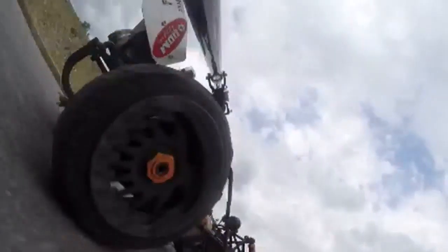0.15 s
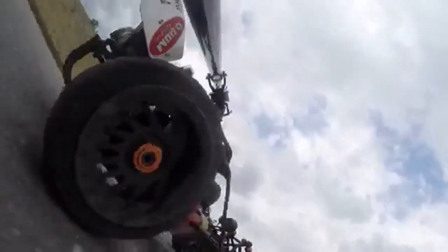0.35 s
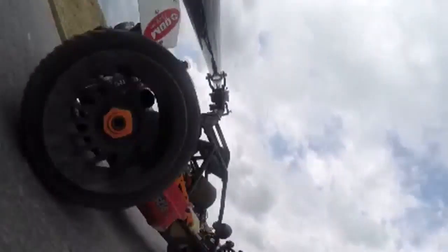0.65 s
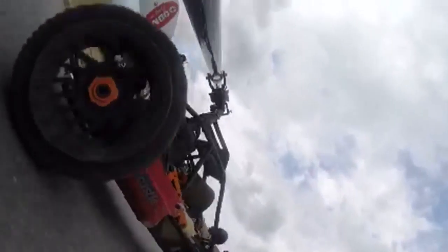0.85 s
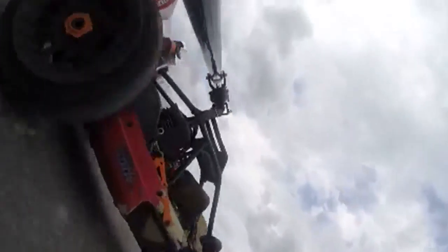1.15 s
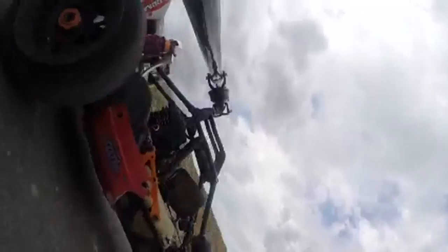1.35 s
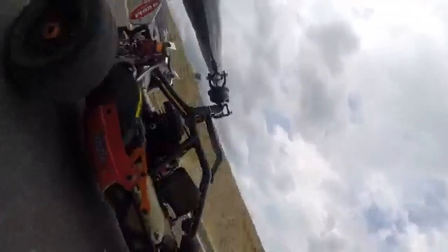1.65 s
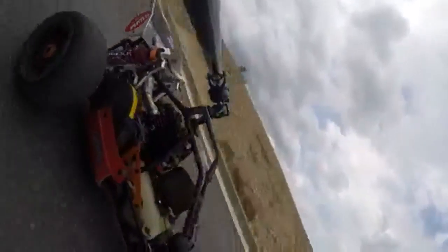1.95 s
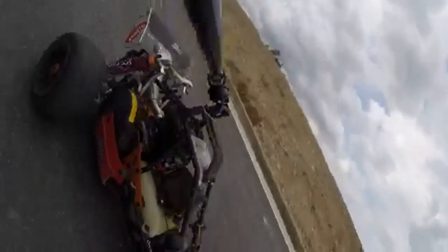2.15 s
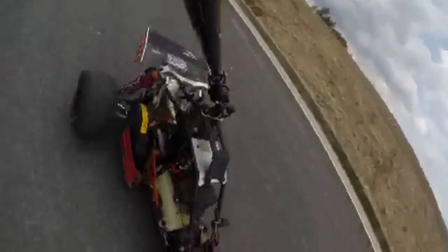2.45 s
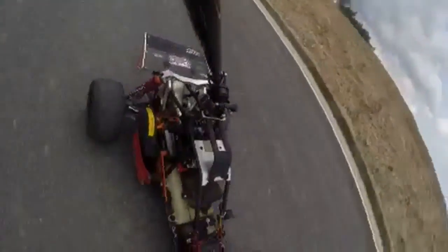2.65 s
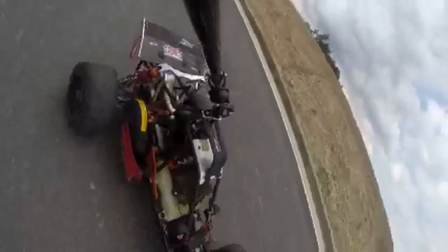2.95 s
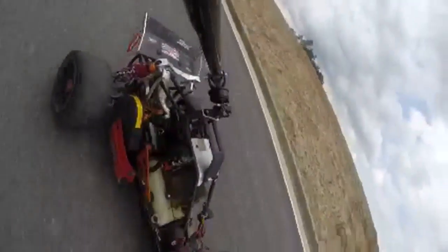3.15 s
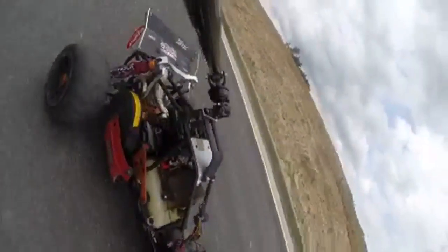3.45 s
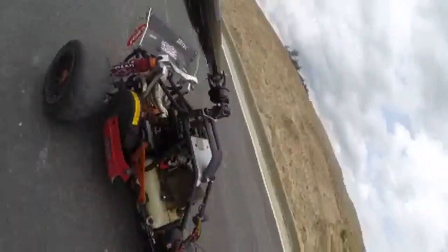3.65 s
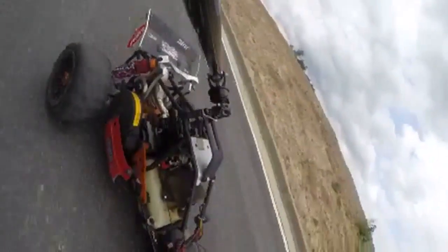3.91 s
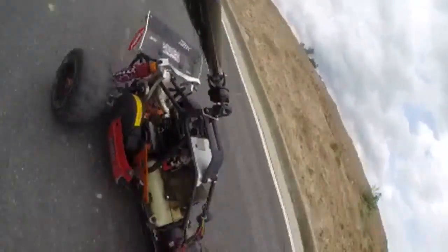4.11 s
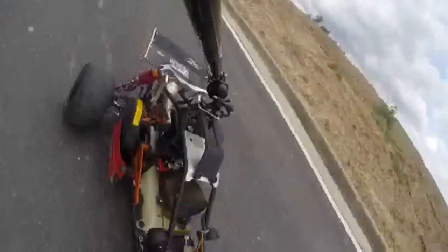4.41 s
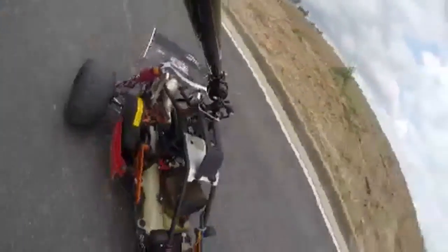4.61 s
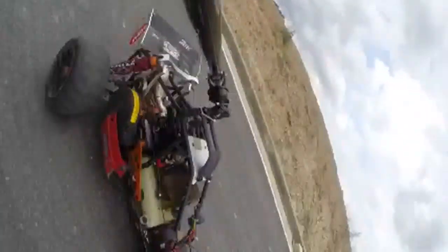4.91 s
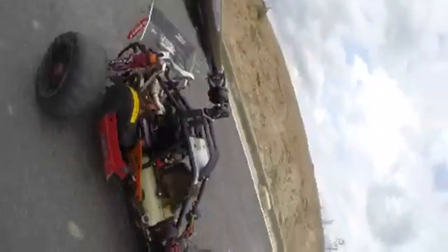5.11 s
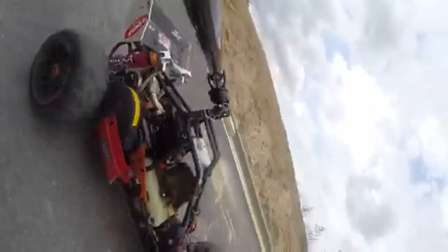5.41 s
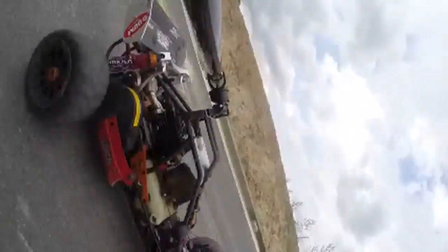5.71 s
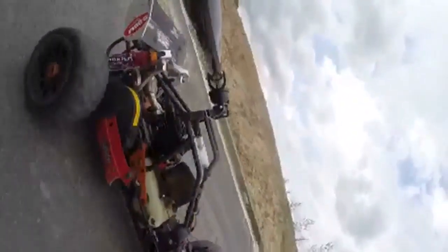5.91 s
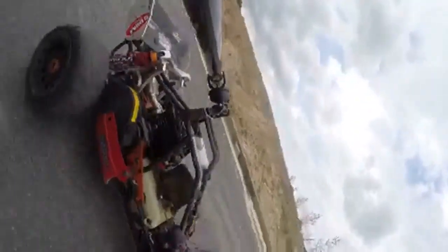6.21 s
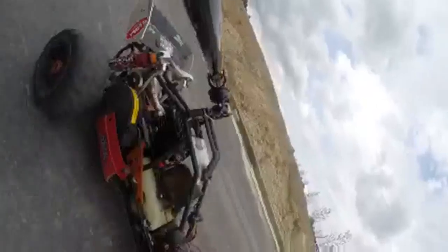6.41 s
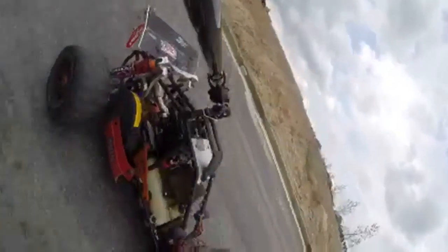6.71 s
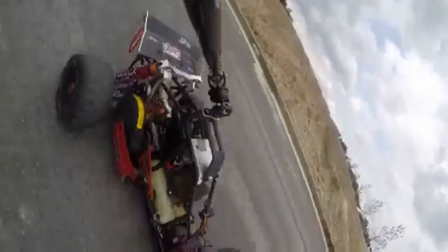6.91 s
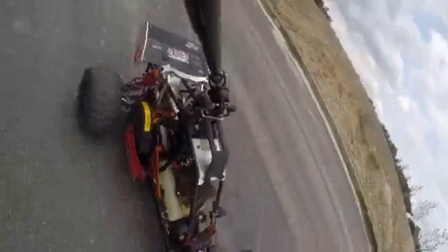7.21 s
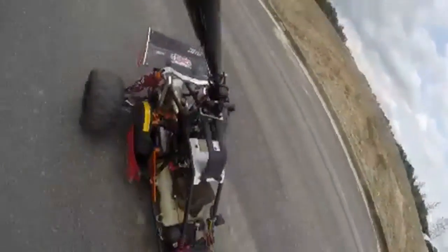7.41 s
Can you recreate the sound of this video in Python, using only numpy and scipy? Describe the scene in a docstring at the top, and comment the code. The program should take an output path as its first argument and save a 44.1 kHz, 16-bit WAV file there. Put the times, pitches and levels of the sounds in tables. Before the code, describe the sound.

Heard from aboard, a remote-controlled buggy's petrol engine runs flat out, drops to idle and blips once, amid close rattles and sharp knocks.

```python
"""On the road, aboard a small two-stroke buggy; the microphone is in a camera on a pole clamped to the
frame. The engine runs at full speed, lifts off near 1.4 s, falls to idle and blips again at 6.65 s; the
brake squeals twice. Firing hum, gear whine, driveline drone, rattles and blows come up the pole and are
heard very close. Rattles, knocks and blows ring in the camera housing, and the hardest blows make the
limiter duck everything."""
import sys
import numpy as np
from scipy import signal
from scipy.fft import rfft, irfft
from scipy.io import wavfile
from scipy.ndimage import uniform_filter1d, minimum_filter1d

SR = 44100
rng = np.random.default_rng(int(sys.argv[2]) if len(sys.argv) > 2 else 0)


def bounce(signal):
    """Save signal as a 16-bit WAV file at the path given by the first command-line argument."""
    frames = np.transpose(np.atleast_2d(signal))
    limited = np.clip(frames, -1, 1)
    pcm = np.round(limited * 32767).astype(np.int16)
    wavfile.write(sys.argv[1], SR, pcm)


N = 333396

# Engine speed and the rattle that goes with it: t/s, firing rate/Hz, rattle level/dB
ENGINE_RUN = [(0, 189.9, -19), (.58, 199, -18), (.86, 202.6, -16), (1.14, 205.5, -18), (1.28, 205, -18),
              (1.35, 208.2, -20), (1.43, 197.4, -19), (1.5, 189, -22.5), (1.72, 179.4, -24),
              (1.88, 168.9, -22), (1.96, 164.6, -20.5), (2.2, 150.7, -21), (2.32, 145.7, -21.5),
              (2.5, 136, -26), (2.72, 125, -23.5), (2.88, 116.9, -37), (3.18, 106.3, -35.5),
              (3.48, 95.94, -38), (3.93, 79.55, -36.5), (4.23, 73.6, -42), (4.38, 73.8, -35.5),
              (4.65, 73, -41), (4.85, 70.32, -39), (5.33, 69.1, -39), (5.5, 71.5, -36.5), (5.81, 71.5, -41),
              (6.0, 74, -38.5), (6.58, 72.8, -40), (6.64, 77.3, -35), (6.7, 89.9, -34), (6.76, 97.5, -33),
              (6.95, 99, -32), (7.07, 96, -31.5), (7.2, 96.4, -33), (7.3, 89.46, -28), (7.53, 76.93, -32)]
# Firing orders as the pole carries them: firing rate/Hz, then level/dB of orders 1, 2, 3 and 5
POLE_ORDERS = [(69.3, -9, -31.5, -43.5, -47.5), (71.9, -8.5, -34.5, -40.5, -42.5),
               (73.7, -8.5, -42, -39, -49.5), (83.2, -10, -32, -33, -61), (80.6, -11, -31.5, -36.5, -63),
               (97.1, -11, -34.5, -52, -61.5), (107, -13, -48, -42, -66), (117, -15.5, -34, -40, -61),
               (138.14, -16.5, -38, -42, -47), (145.4, -15.5, -42.5, -38.5, -33), (150, -13, -40, -32, -32),
               (158, -15, -25, -33, -40), (165, -17, -29, -42, -50), (187, -14.5, -49, -50, -72),
               (192, -19.5, -35.5, -45.5, -37), (193, -23.5, -34.5, -51.5, -40.5),
               (210, -21.5, -44.5, -46, -36)]
# Orders that join at higher revs: order, level/dB against the fifth
HIGH_REV_ORDERS = [(4, -8.5), (6, 6), (7, -4)]
# The throttle opening again: t/s, length/s, level/dB
THROTTLE_BLIP = [(6.65, .7, 0)]
# Wheel speed: t/s, rotation rate/Hz
WHEEL_SPEED = [(0, 24.1), (.35, 24.7), (.9, 25.7), (1.35, 26.3), (1.6, 25.6), (1.95, 24.3), (2.6, 21.5)]
# Gear teeth meshing: multiple of the firing rate or the wheel rate, level/dB
ENGINE_MESH, WHEEL_MESH = [(19, -59), (26, -69)], [(164, -54)]
# Load on the gears: t/s, engine side gain/dB, wheel side gain/dB
GEAR_LOAD = [(0, 10, 8), (1.35, 21.5, 7.5), (1.45, -25, 4), (2, -35, 4), (2.3, -29.5, -35.5)]
# Load on the driveline: t/s, gain of its tones
DRIVE_LOAD = [(0, 0.58), (1.45, 1), (2, 0.68), (2.6, 0.12)]
# Driveline drone and road rumble together: t/s, gain/dB
DRONE_GAIN = [(0, -20.5), (.6, -17.5), (1.5, -20), (2, -29), (2.4, -19.5), (3.3, -26.5), (5, -23.5),
              (7, -24), (7.56, -20)]
# Driveline tones: multiple of the wheel rate, relative level/dB
DRIVELINE_ORDERS = [(1, -5.5), (2.75, 0), (3.95, 6.5), (7, 6), (10, -60.5), (14, -11)]
# Spectrum of the road rumble: f/Hz, relative level/dB
ROAD_SPECTRUM = [(20, -21.5), (45, -9), (80, 14), (120, 2), (200, -6.5), (340, -9), (460, -20.5),
                 (700, -21), (1000, -45.5)]
# Main modes of the camera housing: f/Hz, width/Hz, relative level/dB
HOUSING_MODES = [(350, 129, -12), (831, 142, -7), (970, 50, -9.5), (1236, 192, 1), (1791, 226, -5.5),
                 (2186, 236, -6.5), (2550, 1320, -25.5)]
# Its treble modes: f/Hz, width/Hz, relative level/dB
HOUSING_TREBLE = [(3430, 1400, -7.5), (3880, 400, 1), (4170, 380, 1.5), (5540, 1670, -6.5),
                  (7550, 1900, -13.5), (10600, 2700, -22)]
# The duller rattle at idle: f/Hz, width/Hz, relative level/dB
IDLE_MODES = [(340, 130, -5), (768.6, 95, 0.5), (956, 110, -1), (1227.3, 220, 0.5), (1810, 540, -10),
              (2630, 860, -20)]
# Hard blows on the pole: t/s, level/dB, scrape length/s, bright share/dB, ring f/Hz, ring level/dB
POLE_BLOWS = [(.154, 3.5, 0.0086, 2.5, 1830, 0), (0.193, -5.5, 0.01, 8.5, 1800, -20),
              (0.252, -22, 0.0018, -10, 6000, -23), (0.259, 7, 0.00044, -1, 2290, 6.5),
              (2.585, -18.5, 0.018, -36, 196, -11), (2.6377, 2.5, 0.0024, -19, 1114, 2),
              (4.497, -9, 0.0092, -38, 1750, -23), (4.517, -20, 0.0076, -30, 216, -10),
              (7.364, -13.5, 0.0075, -38, 340, -14.5), (7.374, 6, 0.0038, -47, 1180, 8),
              (7.41, -14, .004, -30, 1195, -12), (7.425, -7, 0.007, -38, 1180, -3)]
# Bare contact noise: f/Hz, width/Hz, relative level/dB
CONTACT_BANDS = [(2500, 4900, 1), (3700, 180, -2), (5700, 3800, -7), (9500, 3500, -21)]
# Loose parts knocking: t/s, relative level/dB
LOOSE_KNOCKS = [(0.594, -0.5), (.755, -2.5), (.916, -3), (.96, -1.5), (1.0, -6.5), (1.037, 3), (1.079, -2),
                (1.118, -2), (1.327, -5), (1.404, -7), (1.447, -10), (1.534, -3), (1.569, -0.5),
                (1.697, -10), (1.746, 0), (1.782, 2), (1.852, -6), (2.551, -13), (2.697, -0.5),
                (2.753, -3.5), (2.787, -6), (2.818, -16.5), (2.852, -19.5), (3.027, -18.5), (3.063, -9.5),
                (3.158, -16.5), (3.212, -12.5), (3.288, -15.5), (3.658, -22), (3.79, -21), (3.852, -23),
                (3.886, -23), (3.94, -26), (3.976, -23), (4.071, -23), (4.13, -26.5), (4.39, -36),
                (4.431, -25), (4.458, -26), (4.622, -20), (5.087, -30), (6.006, -21), (6.073, -29),
                (6.152, -28), (6.207, -22), (6.265, -27), (6.353, -26), (6.424, -32), (6.548, -23.5),
                (6.796, -16.5), (6.858, -14.5), (6.939, -11.5), (7.187, -8)]
# A loose part chattering: t/s, length/s, level/dB
CHATTER_SPELLS = [(1.912, 0.019, -16.5), (1.94, 0.076, -14.5), (2.018, 0.0067, -19), (2.03, 0.034, -10),
                  (2.068, 0.017, -11.5), (2.088, 0.089, -11), (2.21, 0.019, -15.5), (2.305, 0.023, -13.5),
                  (2.368, .022, -17), (2.405, 0.0043, -17), (2.42, 0.036, -20), (2.48, 0.028, -21.5),
                  (2.52, .01, -21.5), (2.582, 0.023, -29)]
# Modes of that part: f/Hz, width/Hz, relative level/dB
LOOSE_PART_MODES = [(774, 94, -9), (1288, 157, 8.5), (1790, 117, 7), (2206, 210, 4.5), (3660, 380, -17.5),
                    (4740, 740, -18), (5830, 200, -16.5), (8080, 450, -31)]
# The brake squealing: t/s, length/s, level/dB
SQUEAL_SPELLS = [(2.33, 0.27, -72), (2.58, 0.047, -53), (2.7, .125, -50.5), (7.181, .012, -39),
                 (7.212, 0.0067, -42), (7.232, 0.21, -52), (7.47, 0.073, -56)]
# Tones of the brake disc: f/Hz, width/Hz, relative level/dB
DISC_MODES = [(5650, 280, -2), (4430, 100, -3), (8560, 300, -16)]


def gain_of(db):
    """Decibels to amplitude."""
    return 10 ** (np.asarray(db) / 20)


def unit_rms(x):
    """The signal scaled to rms 1."""
    return x / np.sqrt(np.mean(x ** 2) + 1e-20)


def along(rows):
    """The columns of a timed table at every sample."""
    times, *columns = np.transpose(rows)
    return [np.interp(np.arange(N) / SR, times, column) for column in columns]


def spells(rows, rise_s, fall_s):
    """An envelope in which each row swells, holds and dies away."""
    t = np.arange(N) / SR
    return sum(gain_of(db) * np.clip((t - start) / rise_s, 0, 1)
               * np.exp(-np.maximum(t - start - length, 0) / fall_s) for start, length, db in rows)


def drift(hz):
    """Random wander below hz, at rms 1."""
    return unit_rms(signal.sosfilt(signal.butter(4, hz, fs=SR, output="sos"), rng.standard_normal(N)))


def tone(turns, db, waver_db, wobble_rad):
    """A sine whose level and phase wander."""
    amplitude = np.sqrt(2) * gain_of(db + waver_db * drift(26))
    return amplitude * np.cos(2 * np.pi * turns + wobble_rad * drift(8.3))


def resonate(x, hz, width_hz):
    """One resonance of gain 1: shift hz down to zero, smooth, shift back."""
    carrier = np.exp(2j * np.pi * np.cumsum(np.full(len(x), hz)) / SR)
    decay = np.exp(-np.pi * width_hz / SR)
    return 2 * (carrier * signal.lfilter([1 - decay], [1, -decay], x / carrier + 1e-18)).real


def ring(x, modes):
    """The signal through a set of modes, scaled so that white noise keeps its rms."""
    click = np.eye(1, 4096)[0]
    response = sum((-1) ** k * gain_of(db) * resonate(resonate(click, hz, width), hz, 2 * width)
                   for k, (hz, width, db) in enumerate(modes))
    return signal.oaconvolve(x, response / np.linalg.norm(response))[:len(x)]


def engine(firing_hz, firings):
    """The firing hum and its orders, each as loud as the pole carries it at this speed."""
    rates, *levels = np.transpose(POLE_ORDERS)
    hum_db, second_db, third_db, fifth_db = (np.interp(firing_hz, rates, db) for db in levels)
    blip = spells(THROTTLE_BLIP, rise_s=0.076, fall_s=0.05)

    def order(k, db):
        return tone(k * firings, db + 2 * drift(3.3), waver_db=2.4, wobble_rad=0.31)
    hum = tone(firings, hum_db + 2 * blip + 0.14 * drift(5), waver_db=0.3, wobble_rad=0.032)
    low_orders = hum + order(2, second_db + 7 * blip) + order(3, third_db)
    high_orders = sum(order(k, fifth_db + db) for k, db in HIGH_REV_ORDERS)
    high_revs = np.clip((firing_hz - 100) / 30, 0, 1)
    # at full revs the sixth order meets a housing mode at 1253 Hz and rings roughly
    rough_sixth = tone(6 * firings + 0.089 * drift(65), db=-23, waver_db=3.5, wobble_rad=2)
    near_mode = np.exp(-((6 * firing_hz - 1253) / 30) ** 2)
    return low_orders + near_mode * rough_sixth + order(5, fifth_db) + high_revs * high_orders


def gear_whine(firings, wheel_turns):
    """Thin whine of meshing teeth: the engine side sings under load, the wheel side also coasting."""
    load_db, coast_db = along(GEAR_LOAD)
    engine_side = sum(tone(k * firings, db + load_db, 1.5, 5.1) for k, db in ENGINE_MESH)
    wheel_side = sum(tone(k * wheel_turns, db + coast_db, 2.1, 1.3) for k, db in WHEEL_MESH)
    return engine_side + wheel_side


def driveline_and_road(wheel_turns):
    """Wavering tones on the wheel's orders, strongest under load, over the rumble of the road."""
    drone = sum(tone(k * wheel_turns, db, 0.63, 0.66) for k, db in DRIVELINE_ORDERS)
    drone = along(DRIVE_LOAD)[0] * unit_rms(drone)
    road_hz, road_db = np.transpose(ROAD_SPECTRUM)
    bin_hz = np.fft.rfftfreq(N, 1 / SR)
    spectrum_db = np.interp(np.log(bin_hz + 1), np.log(road_hz), road_db, right=-90)
    road = irfft(rfft(rng.standard_normal(N)) * gain_of(spectrum_db), N)
    rumble = 0.65 * unit_rms(road) * gain_of(2.8 * drift(20))
    return gain_of(along(DRONE_GAIN)[0]) * (drone + rumble)


def rattle(firing_hz, firings, rattle_db, ticks_per_s=2500, bumps_per_s=16):
    """Ticks and hiss throb with the firing and ring in the housing; road bumps start short bursts."""
    tick_sizes = gain_of(1.9 * np.minimum(rng.exponential(1, N), 4))
    ticks = tick_sizes * (rng.random(N) < ticks_per_s / SR) * rng.choice([-1, 1], N)
    throb = 1 + 0.33 * np.cos(2 * np.pi * firings + 1.3 * drift(25))
    bumps = rng.exponential(1, N) * (rng.random(N) < bumps_per_s / SR)
    t = np.arange(3000) / SR
    bursts = signal.oaconvolve(bumps, np.exp(-t / 0.015) * np.minimum(t / 0.002, 1))[:N]
    shake = throb * (0.31 * unit_rms(ticks) + 0.56 * rng.standard_normal(N)) * gain_of(0.84 * drift(33))
    idle = np.clip((125 - firing_hz) / 45, 0, 0.9)
    pulsing = 1 + 0.34 * idle * np.cos(2 * np.pi * firings)  # at idle each firing is a separate shake
    jolts = pulsing * shake * (1 + (0.25 + 0.78 * idle) * bursts)  # bumps stand out at low revs
    body = np.sqrt(1 - idle) * ring(jolts, HOUSING_MODES)
    body += np.sqrt(idle) * ring(jolts * rng.choice([-1, 1], N), IDLE_MODES)
    treble = ring(shake * (1 + 0.42 * bursts), HOUSING_TREBLE)
    # the treble follows the body down to a floor, which lifts at idle
    treble_gain = np.hypot(gain_of(rattle_db - 21), gain_of(-63 + 7.5 * idle))
    return gain_of(rattle_db) * unit_rms(body) + treble_gain * unit_rms(treble)


def blows():
    """Each blow on the pole is a scrape and a short contact ring; the bright share skips the housing."""
    scrapes, bright, rings = np.zeros((3, N))
    t = np.arange(5000) / SR
    for start, db, length, bright_db, hz, ring_db in POLE_BLOWS:
        at = round(start * SR)
        span = slice(at, at + len(t))
        t60_s = 0.015 + 1.95 * length  # a longer scrape dies away more slowly
        envelope = gain_of(db - 60 * np.maximum(t - length, 0) / t60_s) * np.minimum(t / 0.0012, 1)
        scrape = envelope * rng.standard_normal(len(t))
        scrapes[span] += scrape
        bright[span] += gain_of(bright_db) * scrape
        rise_s = 0.0016 + 0.28 / hz  # a low thud swells more slowly
        rings[span] += gain_of(ring_db) * t / rise_s * np.exp(1 - t / rise_s) * np.sin(2 * np.pi * hz * t)
    return rings + ring(scrapes, HOUSING_MODES) + ring(bright, CONTACT_BANDS)


def knocks(rattle_db, small_per_s=9, t60_s=0.048):
    """Loose parts knock into the housing: a sharp tick, then a noisy tail. Small ones come by chance."""
    hits = gain_of(rattle_db + 10 - 0.5 * rng.standard_normal(N)) * (rng.random(N) < small_per_s / SR)
    times, db = np.transpose(LOOSE_KNOCKS)
    hits[np.round(times * SR).astype(int)] = gain_of(db)
    t = np.arange(2000) / SR
    tails = rng.standard_normal(N) * signal.oaconvolve(hits, gain_of(-60 * t / t60_s))[:N]
    strikes = 3.37 * hits + 0.25 * tails
    return ring(strikes, HOUSING_MODES) + gain_of(-25.5) * ring(strikes, LOOSE_PART_MODES[4:])


def chatter(firings):
    """As the revs fall through its resonance, a loose part taps, scrapes and bounces once per firing."""
    lag = 0.3 + 0.015 * drift(60)  # the bounce comes about a third of a turn later
    taps = np.diff(np.floor(firings), prepend=0)
    bounces = np.diff(np.floor(firings - lag), prepend=-1)
    contacts = unit_rms((taps + 0.35 * bounces) * gain_of(rng.standard_normal(N)))
    scrape = 0.15 * np.exp(-(firings % 1) / 0.3) * rng.standard_normal(N)
    envelope = spells(CHATTER_SPELLS, rise_s=0.0023, fall_s=0.0013)
    return ring((contacts + scrape) * envelope, LOOSE_PART_MODES)


def brake_squeal():
    """The brake disc rings in fuzzy, flickering whistles."""
    envelope = spells(SQUEAL_SPELLS, rise_s=0.008, fall_s=0.006) * gain_of(3.4 * drift(40))
    return envelope * ring(rng.standard_normal(N), DISC_MODES)


def scene():
    """Everything that reaches the microphone on the pole, in mono."""
    firing_hz, rattle_db = along(ENGINE_RUN)
    firings = np.cumsum(firing_hz) / SR
    wheel_turns = np.cumsum(along(WHEEL_SPEED)[0]) / SR
    mix = engine(firing_hz, firings) + gear_whine(firings, wheel_turns) + driveline_and_road(wheel_turns)
    mix += rattle(firing_hz, firings, rattle_db) + blows() + knocks(rattle_db)
    mix += chatter(firings) + brake_squeal()
    return mix[None]


def record(dry, threshold_db=-2.4, hold_samples=1200, recovery_db_per_s=90.5, cutoff_hz=15300):
    """The camera's limiter ducks at once, holds and climbs back steadily; then a clip and a low-pass."""
    peak = -minimum_filter1d(-abs(dry[0]), size=hold_samples + 1, origin=hold_samples // 2)
    climb_db = np.arange(N) * recovery_db_per_s / SR
    held_db = np.maximum.accumulate(20 * np.log10(peak + 1e-9) + climb_db) - climb_db
    duck_db = uniform_filter1d(np.maximum(held_db - threshold_db, 0), size=60)
    limited = np.clip(dry / gain_of(duck_db), -0.97, 0.97)
    lowpass = signal.firwin(511, cutoff_hz, window=("kaiser", 9), fs=SR)
    return signal.oaconvolve(limited, lowpass[None], "same")


dry = scene()
out = record(dry)
bounce(out)
```